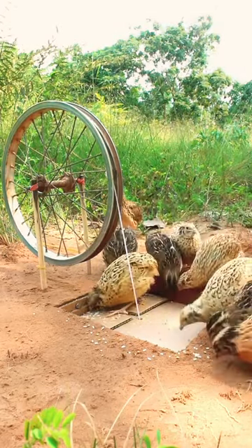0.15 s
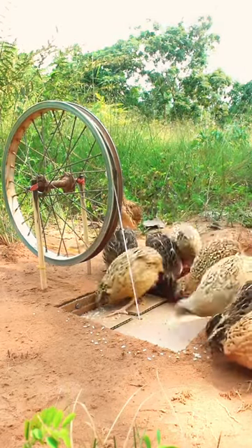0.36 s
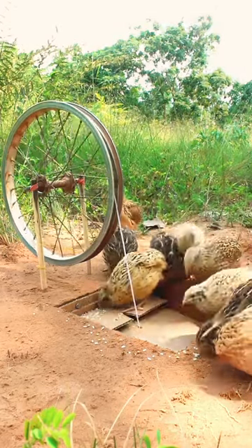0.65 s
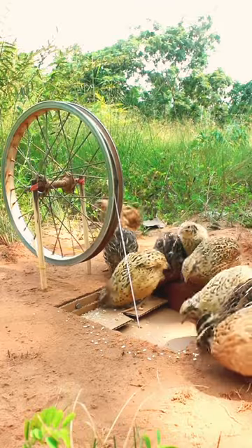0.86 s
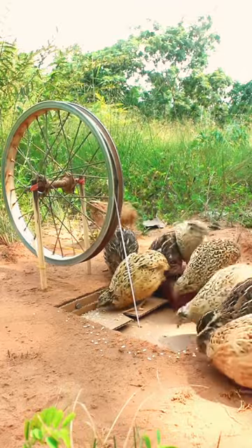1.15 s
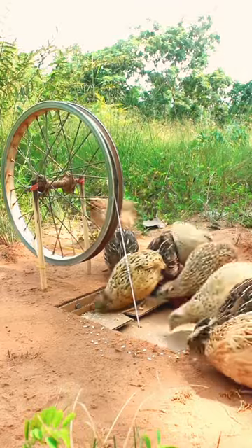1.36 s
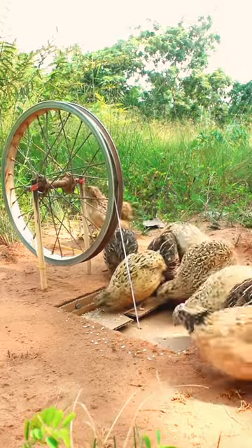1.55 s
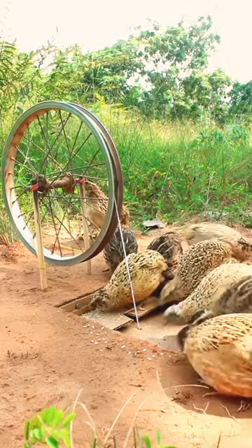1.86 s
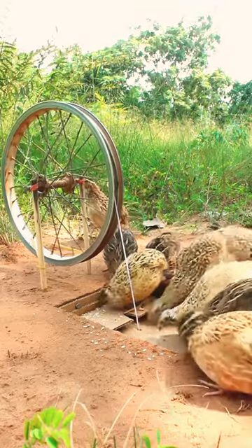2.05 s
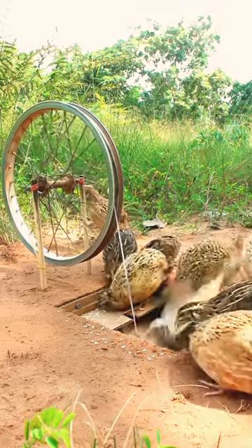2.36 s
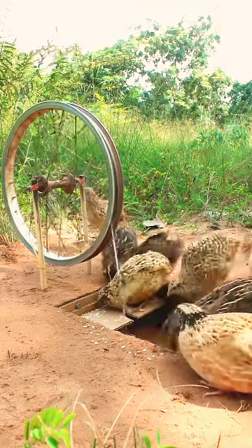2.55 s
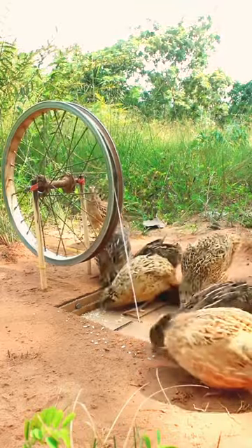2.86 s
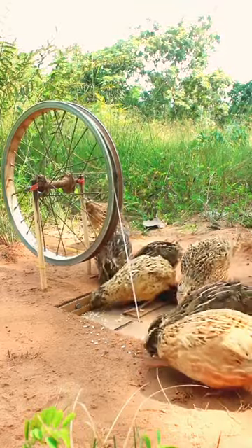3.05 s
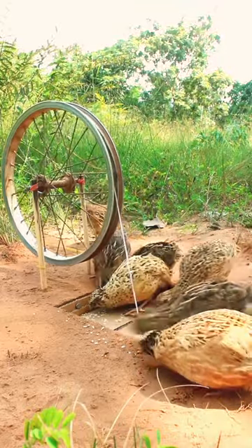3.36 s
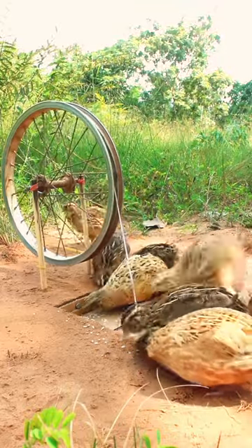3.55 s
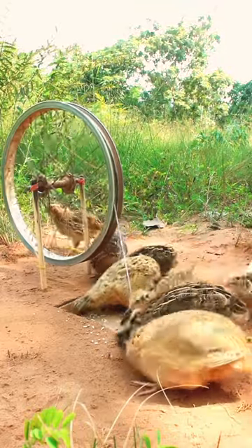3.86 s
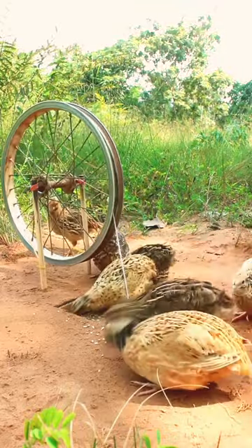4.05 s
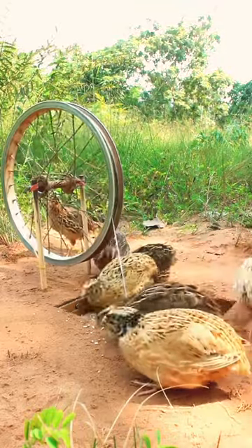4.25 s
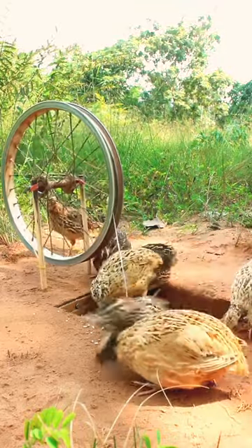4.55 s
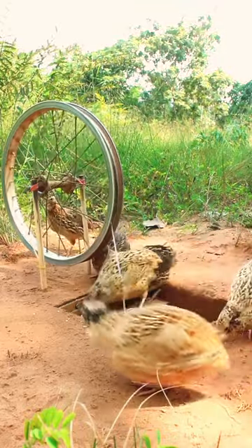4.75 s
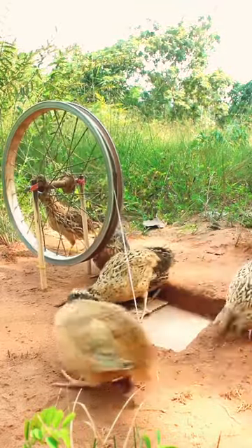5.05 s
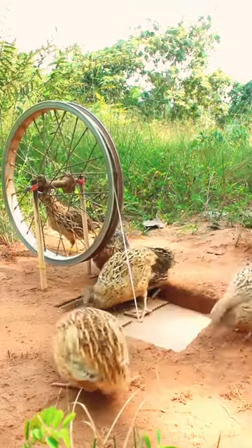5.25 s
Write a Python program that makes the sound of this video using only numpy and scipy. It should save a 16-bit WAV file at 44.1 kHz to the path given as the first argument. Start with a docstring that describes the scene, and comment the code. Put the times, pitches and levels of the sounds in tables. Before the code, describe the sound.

Small ground birds feed on a thin board over a hollow in dry earth, heard close and mostly to the left, over faint open-air hush and hiss. Crisp irregular beak ticks, some with grainy bright tails, mix with short boxy knocks around 200-400 Hz. Firm knocks come at 0.24 and 0.4 s with a burst of feather and claw rustle; tiny high peeps at 0.9 s. Pecking stays sparse, with a solid knock at 1.48 s. From 2.4 to 2.8 s a flurry brings sharp ticks, a quick peep at 2.55 s and scuffling. Short low clucks come at 3.2 s, a strong thud at 3.83 s. From 4.2 to 4.5 s a higher cluck and rough squeaky tones mingle with scrabbling. At 4.84 s one hollow knock far louder than everything else lands; lighter steps, ticks and brief rising peeps follow until 5.4 s. Very short, sharp echoes widen the sound.

```python
"""Small birds on a hollow board

Small ground birds crowd over grain on a thin board laid across a hollow in dry earth, left of the microphone.
Feet and beaks knock the board into decaying modes; beaks tick on grain as filtered bursts with bright grainy tails.
Claws shuffle and feathers rustle as random grains; peeps and clucks glide, and short rough tones stutter.
Eight sharp echoes on each side follow within 40 ms, over an outdoor hush and hiss."""
import sys
import numpy as np
from scipy import signal
from scipy.fft import rfft, irfft, next_fast_len
from scipy.io import wavfile
from scipy.ndimage import uniform_filter1d

SR = 44100
rng = np.random.default_rng(int(sys.argv[2]) if len(sys.argv) > 2 else 0)


def persist_wave(psi):
    """Save psi, clipped to +-1, as 16-bit WAV."""
    counts = np.round(np.clip(psi, -1, 1) * 32767).astype(np.int16)
    wavfile.write(sys.argv[1], SR, np.atleast_2d(counts).T)


N = 238575


def undb(db):
    """Decibels to gain."""
    return 10 ** (np.asarray(db) / 20)


def unit(x):
    """Scale to rms 1."""
    return x / np.sqrt(np.mean(x ** 2))


def colour(x, points):
    """Shape a sound by (Hz, dB) points joined on a log-frequency axis."""
    hz, db = np.transpose(points)
    size = next_fast_len(N)
    bins = np.maximum(np.arange(size // 2 + 1) * SR / size, 1)
    curve_db = np.interp(np.log(bins), np.log(np.maximum(hz, 1)), db)
    return irfft(rfft(x, size) * undb(curve_db), size)[:N]


def add(track, s, sound):
    """Mix a short sound in at time s."""
    i = round(s * SR)
    track[i:i + len(sound)] += sound[:N - i]


def grains(per_s, scatter_db):
    """Random clicks of random sign and uneven size, rms 1."""
    hit = rng.random(N) < per_s / SR
    sign = np.sign(rng.standard_normal(N))
    return unit(hit * sign * undb(scatter_db * rng.standard_normal(N)))


PATCHY_DB = 4  # rms swing of a band


def patchy(x):
    """Narrow bands swell and sink on their own every few hundredths of a second."""
    spectra = signal.stft(x, nperseg=512)[2]
    over_time = uniform_filter1d(rng.standard_normal(spectra.shape), size=3, axis=-1)
    patches = uniform_filter1d(over_time, size=2, axis=-2)
    return signal.istft(spectra * undb(PATCHY_DB * unit(patches)), nperseg=512)[1][..., :N]


HISS_DB = -55.42  # rms, before the bass and top cuts


def hiss():
    """Separate hiss in each channel: differenced noise, so brighter than white, with uneven bands."""
    return undb(HISS_DB) * unit(patchy(np.diff(rng.standard_normal((2, N + 1)))))


# tone of the open air around the board: pitch_hz, level_db (relative)
FIELD = [(15, -57), (25, 23), (53, 15), (134, 16), (242, 5), (373, 0.5), (714, -7), (1020, -20),
         (1740, -47), (2550, -14), (13600, -14.5), (14800, -69), (16000, -60)]
FIELD_DB = -48  # rms at the board, before the left and right colouring


def field():
    """Steady outdoor hush: shaped noise."""
    return undb(FIELD_DB) * unit(colour(rng.standard_normal(N), FIELD))


# bright grainy tails, many of them after ticks: start_s, fade_s, level_db
BRIGHT_TAILS = [(.05, 0.082, -48.5), (0.361, .03, -55), (.535, 0.036, -50), (.8, 0.072, -47.5),
                (1.008, 0.036, -46), (1.94, 0.036, -49), (2.13, .03, -51), (2.39, .02, -49),
                (2.56, 0.042, -44), (3.245, .04, -48), (3.585, 0.033, -45.5), (4.004, 0.018, -45),
                (4.69, 0.035, -50), (5.19, .04, -51)]


def bright_tails(low_hz=7700.0, rise_s=0.0033):
    """Fine grains above 7.7 kHz that start almost at once and fade away."""
    t, gain = np.arange(SR // 4) / SR, np.zeros(N)
    for s, fade_s, db in BRIGHT_TAILS:
        add(gain, s, undb(db) * np.minimum(t / rise_s, 1) * np.exp(-t / fade_s))
    bright = signal.butter(2, low_hz, "highpass", fs=SR, output="sos")
    return gain * unit(signal.sosfilt(bright, grains(4000., 5.3)))


FLUTTER_S, FLUTTER_DB = 0.034, 3  # smoothing time, rms swing


def flutter():
    """Gain that wavers at random, as feathers brush unevenly."""
    size = int(FLUTTER_S * SR)
    slow = uniform_filter1d(uniform_filter1d(rng.standard_normal(N), size), size)
    return undb(FLUTTER_DB * unit(slow))


# tone of brushing feathers: pitch_hz, level_db (relative, per Hz)
FEATHER = [(1500, 6), (3000, 4.5), (4500, 2), (6500, -3), (10000, -7.5), (15500, -11)]


def feathers():
    """Rustle: dense shaped grains, patchy in pitch and fluttering in strength."""
    return flutter() * unit(patchy(colour(grains(2500., 4.5), FEATHER)))


# clucks close to the board: start_s, length_s, start_hz, end_hz, level_db,
# throat_hz, throat_width_octaves, odd_overtones_db
CLUCKS = [(3.202, 0.031, 166.4, 167, -33, 1180, 1.16, -15), (3.244, 0.027, 278, 278, -29.5, 885, 1.3, -7),
          (4.239, 0.065, 642, 650, -39, 1410, 1.3, -1)]


def clucks(jitter=.008, stutter=.4):
    """Short voiced notes: overtones through a broad throat resonance, quick to start and a little hoarse."""
    out = np.zeros(N)
    chances = rng.standard_normal((len(CLUCKS), SR // 8))
    for (s, length, start_hz, end_hz, db, throat_hz, octaves, odd_db), chance in zip(CLUCKS, chances):
        part = np.linspace(0, 1, int(length * SR))
        hz = start_hz + (end_hz - start_hz) * part
        hz = hz * (1 + jitter * unit(uniform_filter1d(chance, size=200))[:len(part)])
        rough = 1 + stutter * unit(uniform_filter1d(chance[::-1], size=100))[:len(part)]
        k = np.arange(1, int(4200 / start_hz))[:, None]  # overtone numbers
        throat = np.exp(-(np.log2(k * start_hz / throat_hz) / octaves) ** 2)
        gain = throat * undb(odd_db * (k % 2))
        tone = np.sum(gain * np.sin(2 * np.pi * k * np.cumsum(hz) / SR), axis=0)
        swell = np.minimum(part / 0.087, 1) * np.sqrt(1 - part)
        add(out, s, undb(db) * swell * rough * tone / np.max(np.abs(tone)))
    return out


# peeps: start_s, slide_s, hold_s, start_hz, top_hz, last_hz, level_db
PEEPS = [(0.896, .008, .006, 3600, 5600, 5300, -52), (0.912, .008, .014, 4700, 5500, 3400, -54),
         (0.95, .01, .015, 4700, 5000, 4800, -57), (2.06, .01, .03, 4250, 4500, 4350, -58),
         (2.526, 0.008, 0.008, 2480, 2540, 2540, -39), (2.546, .002, .004, 2570, 2600, 2590, -31),
         (2.574, 0.004, 0.008, 4650, 4600, 4600, -40), (3.354, 0.003, 0.014, 1400, 1420, 1440, -45),
         (3.46, 0.006, .008, 4700, 5100, 5000, -54), (3.371, 0.011, 0.009, 1500, 2880, 2820, -48),
         (4.533, 0.005, 0.024, 1580, 1617, 1630, -46), (4.557, 0.013, 0.008, 1630, 2700, 2600, -45),
         (4.875, 0.0035, 0.0072, 2300, 2450, 2450, -41.5), (5.056, 0.013, 0.016, 1550, 3480, 3420, -43),
         (5.36, 0.011, 0.012, 1150, 1850, 1400, -46)]


def peeps(waver=0.4, wobble=0.01, waver_s=0.003):
    """Short whistles, most sliding up fast and swelling, then holding or sagging; strength and pitch waver."""
    out = np.zeros(N)
    chances = rng.standard_normal((len(PEEPS), SR // 8))
    for (s, slide_s, hold_s, start_hz, top_hz, last_hz, db), chance in zip(PEEPS, chances):
        t = np.arange(int((slide_s + hold_s) * SR)) / SR
        turns_s = [0, slide_s, slide_s + hold_s]
        path_hz = np.interp(t, turns_s, [start_hz, top_hz, last_hz])
        hz = uniform_filter1d(path_hz, size=150, mode="nearest")  # rounds the corner
        hz = hz * (1 + wobble * unit(uniform_filter1d(chance[::-1], size=130))[:len(t)])
        swell = np.interp(t, turns_s, [.1, 1, 0]) ** 0.11
        rough = 1 + waver * unit(uniform_filter1d(chance, int(waver_s * SR)))[:len(t)]
        add(out, s, undb(db) * swell * rough * np.sin(2 * np.pi * np.cumsum(hz) / SR))
    return out


# short rough tones (squeaks, rings of ticks and knocks, strong overtones of clucks):
# start_s, length_s, start_hz, end_hz, level_db
ROUGH_TONES = [(2.56, 0.02, 1323, 1310, -30), (3.176, 0.031, 900, 885, -45), (3.179, 0.034, 638, 634, -44),
               (3.206, 0.032, 850, 810, -38), (3.177, .03, 1525, 1510, -47),
               (3.207, 0.023, 1347, 1380, -37), (4.293, 0.025, 1993, 1975, -30),
               (4.292, 0.021, 2335, 2310, -35), (4.292, .025, 2680, 2600, -42),
               (4.296, .02, 1700, 1705, -34), (4.835, 0.011, 1020, 984, -23), (4.265, 0.056, 642, 604, -36),
               (4.3, 0.043, 1084, 1024, -34.5), (4.367, 0.051, 2543, 2554, -34.5),
               (4.385, 0.052, 2676, 2600, -37.5), (4.4, 0.036, 2336, 2234, -37),
               (4.438, 0.046, 2200, 1970, -43), (4.441, 0.042, 2550, 2430, -47),
               (4.433, 0.058, 995, 1014, -37.5), (4.547, 0.024, 796, 820, -42.5),
               (4.653, 0.027, 1560, 1555, -43), (5.383, 0.026, 1390, 1380, -41.5)]


def rough_tones(stutter_s=0.0024):
    """Sliding tones whose strength stutters at random, so that they sound rough."""
    out = np.zeros(N)
    chances = rng.standard_normal((len(ROUGH_TONES), SR // 8))
    for (s, length, start_hz, end_hz, db), chance in zip(ROUGH_TONES, chances):
        part = np.linspace(0, 1, int(length * SR))
        stutter = 0.55 + 0.45 * unit(uniform_filter1d(chance, int(stutter_s * SR)))[:len(part)]
        hz = start_hz + (end_hz - start_hz) * part
        tone = np.sin(2 * np.pi * np.cumsum(hz) / SR)
        swell = np.sqrt(np.sin(np.pi * part).clip(0))
        add(out, s, undb(db) * swell * stutter * tone)
    return out


# modes of the thin board over the hollow: pitch_hz, level_db (relative), t60_s (ringing freely)
BOARD = [(87, -6, 0.14), (157.6, -3.5, 0.19), (230.6, 0, 0.15), (266.2, 8, 0.13), (313.8, 10.5, 0.08),
         (377.5, 15, 0.038), (458.7, 0.5, 0.063), (501.8, 3.5, 0.059), (557.4, -12, 0.14),
         (665, -33, 0.089), (713, -5.5, 0.049), (863, -10.5, 0.059), (973, -1.5, 0.046), (1032, -10, 0.058),
         (1384, -1, 0.013), (1474, 7.5, 0.0019), (1600, -18.5, 0.052), (1930, -9.5, 0.022),
         (2220, -39, 0.012), (2615, -15, 0.02), (3220, -15, 0.011)]
MIDDLE_HZ, UPPER_HZ = 420, 600  # where the board's middle and upper modes begin


def ring(gain, share, push_s):
    """Decaying modes build up in push_s at 250 Hz, the higher ones sooner; share scales the decay; peak 1."""
    hz, db, t60 = np.transpose(BOARD)[:, :, None]
    t = np.arange(SR // 9) / SR
    rise = np.sin(np.pi / 2 * np.minimum(t * hz / (250 * push_s), 1)) ** 2
    decay = np.exp(-np.log(1000) * t / (t60 * share))
    wave = gain @ (undb(db) * rise * np.sin(2 * np.pi * hz * t) * decay)
    return wave / np.max(np.abs(wave))


def scatter(start, hz, cycles, size):
    """One damped little ring per grain; cycles is its sharpness (Q)."""
    out = np.zeros(N)
    for i, f, g in zip(start, hz, size):
        turns = np.arange(int(2 * cycles * SR / f)) * f / SR
        add(out, i / SR, g * np.exp(-np.pi * turns / cycles) * np.sin(2 * np.pi * turns))
    return out


CLAW_CYCLES, CLAW_SPREAD_OCTAVES = 9, .5


def claws(centre_hz, per_s=750.):
    """Scraping: each grain rings near the board mode closest to a pitch drawn round a wandering centre."""
    start = np.flatnonzero(rng.random(N) < per_s / SR)
    pitch_chance, size_chance, detune_chance = rng.standard_normal((len(start), 3)).T
    mode_hz = np.array(BOARD)[:, 0]
    wish_hz = centre_hz[start] * 2 ** (CLAW_SPREAD_OCTAVES * pitch_chance)
    nearest = np.argmin(np.abs(np.log(wish_hz[:, None] / mode_hz)), axis=1)
    hz = mode_hz[nearest] * (1 + 0.0068 * detune_chance)
    size = undb(4 * size_chance) * np.sqrt(hz / centre_hz[start])
    return unit(scatter(start, hz, CLAW_CYCLES, size))


# a bird shuffles on the board: peak_s, fade_s, feet_db, claws_db, feathers_db, claw_pitch_hz
# (levels relative to BUSTLE_DB, as are the still levels below)
SHUFFLES = [(0.067, 0.02, -55, -61, -39, 870), (0.27, 0.02, -46, -58, -69, 844),
            (0.366, 0.035, -26, -29, -34, 1257), (0.6, 0.079, -31, -69, -52, 865),
            (0.71, 0.12, -41, -67, -40.5, 1020), (0.801, 0.0083, -54, -73, -36.5, 720),
            (0.93, 0.14, -68, -93, -47.5, 935), (1.189, 0.067, -37, -70, -43.5, 990),
            (1.369, 0.033, -37, -71, -43, 1330), (1.49, 0.03, -32, -44.5, -72, 710),
            (1.55, 0.084, -37, -47.5, -41, 1150), (1.775, 0.019, -42.5, -45, -45, 1430),
            (1.961, 0.056, -42.5, -61.5, -45, 1160), (2.16, 0.064, -36, -72, -44, 800),
            (2.29, 0.22, -37.5, -55, -57.5, 794), (2.43, 0.11, -29, -47.5, -39.5, 980),
            (2.542, 0.079, -26, -35.5, -36, 1320), (2.63, 0.063, -29.5, -63, -49, 1010),
            (2.68, 0.033, -47, -36.5, -33, 1840), (2.738, 0.06, -25, -40, -31.5, 1555),
            (2.799, 0.034, -29, -28.5, -68, 676), (2.996, 0.071, -31, -40, -38, 1570),
            (3.297, 0.097, -57, -43, -48.5, 803), (3.58, 0.076, -37, -47, -45.5, 1460),
            (3.832, 0.11, -31.5, -46, -63, 690), (4.038, 0.034, -27.5, -49, -35, 1330),
            (3.969, 0.1, -35, -48, -38, 830), (4.108, 0.017, -50, -57, -30.5, 1310),
            (4.245, 0.033, -49, -44.5, -38, 1800), (4.16, 0.088, -35, -67, -39, 900),
            (4.309, 0.084, -31.5, -33.5, -64, 1310), (4.411, 0.038, -25, -32, -64, 1510),
            (4.52, 0.049, -38.5, -40.5, -71, 1022), (4.681, 0.06, -35.5, -46, -44, 1400),
            (4.751, 0.032, -22, -28, -36.5, 786), (4.825, 0.055, -33, -28.5, -34.5, 980),
            (4.89, 0.033, -23.5, -42.5, -60, 880), (4.97, 0.064, -29.5, -49, -43, 980),
            (5.173, 0.078, -30.5, -40.5, -40.5, 1030), (5.41, 0.017, -56, -33.5, -42, 716)]
# steady rustle under the shuffles, which dips briefly: time_s, level_db (relative to BUSTLE_DB)
RUSTLE = [(0, -46.5), (1.3, -51), (3.4, -49.5), (4.4, -45), (4.47, -54), (4.62, -58), (4.7, -52),
          (5.41, -52)]
SWELL_SHARE = 0.69  # a shuffle swells in this share of its fade time
STILL_FEET_DB, STILL_CLAW_DB = -50.5, -60  # between shuffles


def shuffles():
    """Each shuffle swells and fades; gains of feet, claws and feathers, and a pitch led by the loudest claws."""
    t = np.arange(0, N, 32) / SR
    s, fade_s, feet_db, claw_db, feather_db, claw_hz = np.transpose(SHUFFLES)[:, :, None]
    power = np.exp(-2 * np.where(t > s, t - s, (s - t) / SWELL_SHARE) / fade_s)

    def gain(db, still_db):
        """Powers of all shuffles and the still level, summed."""
        return np.sqrt(np.sum(undb(db) ** 2 * power, axis=0) + undb(still_db) ** 2)

    weight = undb(claw_db) ** 2 * power
    controls = (gain(feet_db, STILL_FEET_DB),
                gain(claw_db, STILL_CLAW_DB),
                gain(feather_db, np.interp(t, *np.transpose(RUSTLE))),
                np.sum(weight * claw_hz, axis=0) / np.sum(weight, axis=0))
    return [np.interp(np.arange(N) / SR, t, control) for control in controls]


BUSTLE_DB = -8.0  # added to every shuffle and rustle level


def bustle(wide_db=-4):
    """Many small steps ring the board and claws scrape, at one spot; feathers also rustle apart left and right."""
    feet_gain, claw_gain, feather_gain, claw_hz = shuffles()
    below_upper = 1. * (np.array(BOARD)[:, 0] < UPPER_HZ)
    board = ring(below_upper, 0.51, 0.01)
    steps = grains(150., 5.5)
    feet = signal.fftconvolve(feet_gain * steps, board)[:N] / np.sqrt(np.sum(board ** 2))
    centre, left, right = (feather_gain * feathers() for _ in range(3))
    spot = feet + claw_gain * claws(claw_hz) + centre
    return undb(BUSTLE_DB) * (spot + undb(wide_db) * np.array([left, right]))


# beak and claw ticks: start_s, level_db, centre_hz, crack_db (relative to the tick), length_s (0.02 at most)
TICKS = [(0.054, -29.5, 980, -9, 0.0022), (0.213, -29.5, 1390, -33, 0.011),
         (0.223, -32.5, 2650, -12, 0.0045), (0.322, -37, 835, -19, 0.0056),
         (0.361, -34.5, 1450, 11.5, 0.0012), (0.3626, -22.5, 2670, 4.5, 0.0033),
         (0.529, -41, 1280, 8.5, 0.01), (0.567, -35, 950, -4.5, 0.0017), (0.707, -34, 2630, 2, 0.0072),
         (0.799, -22.5, 4300, -22, 0.002), (0.948, -34, 3000, -15, 0.0041), (1.0093, -28, 970, 6, 0.023),
         (1.0205, -26.5, 980, 6, 0.0026), (1.029, -27, 1000, 4, 0.003), (1.035, -28.5, 3000, -15, 0.0028),
         (1.198, -33.5, 2600, -7, 0.0022), (1.2112, -29, 1010, -6, 0.0027), (1.36, -41, 1130, 5, 0.0068),
         (1.6034, -33.5, 1280, 1, 0.0027), (1.62, -35.5, 1300, 6, 0.0056), (1.763, -32, 3560, -23, 0.0051),
         (1.931, -35, 1050, -10, 0.0038), (1.957, -33.5, 3700, 0, 0.0056), (2.11, -40, 1020, 9, 0.0043),
         (2.159, -39, 3300, 2, .006), (2.252, -41.5, 2580, 13, 0.0067), (2.369, -36, 2010, -9, 0.0023),
         (2.391, -30, 935, 9, 0.004), (2.4325, -25, 1250, -8, 0.002), (2.452, -33, 1150, -8, .002),
         (2.4855, -29, 1050, -13, 0.0018), (2.5643, -16.5, 1180, -20, 0.0015),
         (2.5688, -18.5, 1260, -7, 0.0019), (2.599, -33, 2940, -12, 0.0026), (2.634, -37, 1150, -6, .002),
         (2.669, -39, 1970, -17, 0.0059), (2.705, -32, 1760, -10, 0.004), (2.724, -32, 3680, -25, 0.01),
         (2.7335, -31, 3570, -20, .003), (2.7378, -20.5, 1910, -25, 0.0072), (2.749, -20, 870, -31, 0.0019),
         (2.936, -35, 1090, -17, 0.018), (3.085, -34.5, 1330, 0, 0.0026), (3.175, -45, 865, -11, 0.0055),
         (3.211, -42, 2800, -20, 0.0089), (3.264, -36, 1050, -20, 0.0058), (3.255, -38, 2590, -20, .012),
         (3.282, -34.5, 880, -20, 0.0053), (3.302, -29, 1100, -25, .0012), (3.3125, -29, 1200, -25, .0012),
         (3.354, -38.5, 895, -20, 0.0056), (3.436, -39.5, 1400, -9, 0.0029), (3.544, -44, 2500, -3, .001),
         (3.555, -47, 4500, -9, .001), (3.564, -29.5, 1480, -8, 0.00066), (3.5835, -30, 1410, -3, 0.0014),
         (3.5973, -28, 1330, -5, 0.0023), (3.731, -32, 1060, -23, 0.0078), (3.825, -37, 1020, -35, 0.0093),
         (3.955, -33.5, 4260, -6, 0.013), (4.006, -39, 1990, 6, .002), (4.016, -49, 4000, -6, 0.0018),
         (4.038, -32.5, 1820, -9, 0.0064), (4.101, -31, 4220, -12, 0.0063), (4.163, -27, 980, -7, 0.0059),
         (4.292, -32, 2300, -30, 0.003), (4.302, -23, 2100, -30, .005), (4.349, -27, 1300, -18, 0.0015),
         (4.373, -28, 2500, -18, .002), (4.381, -28, 2550, -18, .002), (4.395, -37, 2400, -25, 0.007),
         (4.4345, -29, 940, -25, 0.0052), (4.533, -36, 1200, -26, 0.002), (4.659, -37.5, 980, -20, 0.011),
         (4.69, -39, 2980, 1, 0.011), (4.748, -42, 890, -23, 0.012), (4.836, -32, 1000, -30, 0.003),
         (4.956, -26, 1490, -13, 0.0018), (5.301, -43.5, 1970, 8, 0.0047), (5.382, -36, 860, -18, 0.018),
         (5.393, -37, 640, -35, .015)]
TICK_SHARPNESS, TICK_RISE_S = 1.16, .0005  # Q of the resonance, rise of the burst
STRIKE_SIZE, STRIKE_S = 7, .004  # clean strike, and the tick length over which it fades


def ticks(crack_s=0.0006):
    """Grit through a resonance, short bursts led by a clean strike, with the brief bright crack of a grain."""
    out, t = np.zeros(N), np.arange(SR // 16) / SR
    crack_band = signal.butter(2, [2600, 6800], "bandpass", fs=SR, output="sos")
    grits = rng.standard_normal((len(TICKS), len(t)))
    for (s, db, hz, crack_db, length), grit in zip(TICKS, grits):
        burst = grit * np.exp(-t / np.clip(length, .0005, .02)) * np.minimum(t / TICK_RISE_S, 1)
        burst[10] = STRIKE_SIZE * np.exp(-(length / STRIKE_S) ** 2)
        peak = signal.iirpeak(hz, TICK_SHARPNESS, SR)
        resonant = signal.lfilter(*peak, signal.lfilter(*peak, burst))
        body = resonant + undb(-23) * uniform_filter1d(burst, size=4)  # a little unresonated grit
        crack = signal.sosfilt(crack_band, grit * np.exp(-(t / crack_s) ** 2))
        tick = body / np.max(np.abs(body)) + undb(crack_db) * crack / np.max(np.abs(crack))
        add(out, s, undb(db) * tick)
    return out


# knocks on the board: start_s, level_db (peak), favoured_pitch_hz, middle_modes_db, upper_modes_db,
# ring_share (of the free decay, 0.2 at least)
KNOCKS = [(0.049, -25.5, 236, -8.5, 2.5, 0.33), (0.217, -27.5, 153, -12, -11, 0.77),
          (0.238, -14, 212.2, -29, -33, 0.41), (0.317, -32.5, 221, -16, -30, 0.4),
          (0.396, -14.5, 222, -15, -29, 0.83), (0.525, -40, 163, -24, -6, 1),
          (0.567, -28, 246.6, -28, -2.5, 0.71), (0.61, -25.5, 242, -30, -19, 0.9),
          (0.685, -25.5, 238.6, -29, -22, 1), (0.721, -36, 304, -22, -27, 1),
          (0.797, -26.5, 229, -7.5, -5.5, 0.74), (0.945, -37, 320, 4, -12, 0.73),
          (1.0083, -25, 237.7, -10, -5, 0.76), (1.211, -29, 304, -35, -27, 0.22),
          (1.478, -15, 264, -7, -12, 0.33), (1.599, -28.5, 290, -1, -6, 0.79),
          (1.64, -34.5, 158, -18, -23, 0.33), (2.187, -24, 237, -47, -10, 0.54),
          (2.312, -34, 239, -36, -14, .99), (2.387, -27.5, 204, -22, -12.5, 1),
          (2.485, -15, 264, -34, -1, 0.17), (2.569, -19.5, 307, -21, 17, 0.44),
          (2.757, -18, 262, -1, 11, 0.96), (2.81, -21.5, 263, 1, -16, 1), (2.937, -27, 247, -14.5, -26, 1),
          (2.989, -27.5, 294, -23, -24, 1), (3.082, -27, 230, -21, -22, 0.36),
          (3.301, -33, 209.6, -16.5, -24, 0.62), (3.434, -36.5, 226, -16, -4, 0.39),
          (3.57, -29.5, 229, -14.5, -17, 0.47), (3.735, -31, 218, -14.5, -25, 0.48),
          (3.835, -12, 244, -4, -5, 0.54), (3.91, -27.5, 243, -35, -12, 0.61),
          (3.985, -28, 245, -9, -14, 0.57), (4.056, -29, 220, -23, -11, 0.41),
          (4.105, -26, 220, -27, -18, 0.57), (4.163, -25, 270, 3, 10, 1), (4.355, -24, 256, -34, -4, 0.81),
          (4.4332, -18.5, 270, -8, -4, 1), (4.714, -37, 214, -13, -28, 0.73), (4.745, -22, 455, 5, -16, 1),
          (4.826, -21.5, 279, 11, 13, 0.81), (4.8355, 0, 327.3, -55, -4, 0.39),
          (4.919, -33, 228, -3, -2, 0.52), (4.955, -21, 263, -35, -6, 0.82),
          (5.016, -27.5, 286, -38, -5.5, 0.89), (5.15, -34, 222, -3, -8, 0.85),
          (5.21, -23, 280, -25, -7, 1)]
CONTACT_S = 0.0059  # build-up of a 250 Hz mode


def knocks(reach_octaves=0.12):
    """The place of a blow favours the low modes near one pitch; a hard contact wakes the higher ones."""
    out, mode_hz = np.zeros(N), np.array(BOARD)[:, 0]
    chance = rng.standard_normal((len(KNOCKS), len(BOARD)))
    for (s, db, hz, middle_db, upper_db, share), place in zip(KNOCKS, chance):
        low = 0.074 + np.exp(-(np.log2(mode_hz / hz) / reach_octaves) ** 2)
        upper = undb(upper_db + 2.5 * place)
        middle_or_upper = np.where(mode_hz < UPPER_HZ, undb(middle_db), upper)
        gain = np.where(mode_hz < MIDDLE_HZ, low, middle_or_upper)
        add(out, s, undb(db) * ring(gain, np.clip(share, .2, 2), CONTACT_S))
    return out


# tone of every echo: pitch_hz, level_db
ECHO_TONE = [(250, -2.5), (1500, 0)]


def echoes(x, table):
    """The sound plus its delayed copies, a little thinner in the bass, some of them inverted."""
    out, thin = x.copy(), colour(x, ECHO_TONE)
    for ms, gain in table:
        add(out, ms / 1000, gain * thin)
    return out


# echoes reaching the left and the right: delay_ms, gain (signed)
ECHO_LEFT = [(15.01, -.33), (16.51, -.31), (18.32, .5), (19.82, .52), (21.32, -.31), (30.68, .39),
             (32.18, .43), (33.67, -.26)]
ECHO_RIGHT = [(15.01, .36), (16.51, .46), (18.0, -.33), (21.32, .41), (26.05, .48), (30.68, -.3),
              (35.87, -.27), (37.37, -.28)]
# how far the left leads, the board lying left of the microphone: pitch_hz, left_minus_right_db
LEFT_LEAD = [(60, 18), (110, 4), (200, 9), (380, 8.5), (700, 8), (1290, 6), (2380, 4), (4400, 1.5),
             (8120, 2), (15000, -0.5)]


def scene():
    """Mostly one spot of sound; the right side hears less bass."""
    near = field() + bright_tails() + clucks() + peeps() + rough_tones() + bustle() + ticks() + knocks()
    lead = np.array(LEFT_LEAD)
    # a quarter of the lead lifts the left, the rest lowers the right; both gain 1 dB
    left = colour(echoes(near[0], ECHO_LEFT), lead * [1, .25] + [0, 1.0])
    right = colour(echoes(near[1], ECHO_RIGHT), lead * [1, -.75] + [0, 1.0])
    return np.array([left, right])


LOW_CUT_HZ, TOP_HZ = 129.5, 15600


def record(dry):
    """Each channel hisses on its own; the bass is cut, peaks beyond 0.98 clip, the top is cut steeply."""
    low_cut = signal.butter(2, LOW_CUT_HZ, "highpass", fs=SR, output="sos")
    lean = signal.sosfilt(low_cut, dry + hiss())
    top_cut = signal.ellip(10, .2, 80, TOP_HZ, fs=SR, output="sos")
    return signal.sosfilt(top_cut, np.clip(lean, -.98, .98))


dry = scene()
out = record(dry)
persist_wave(out)
```